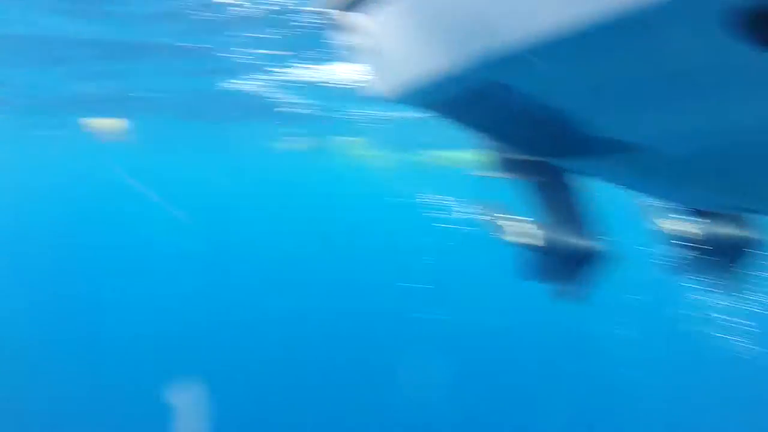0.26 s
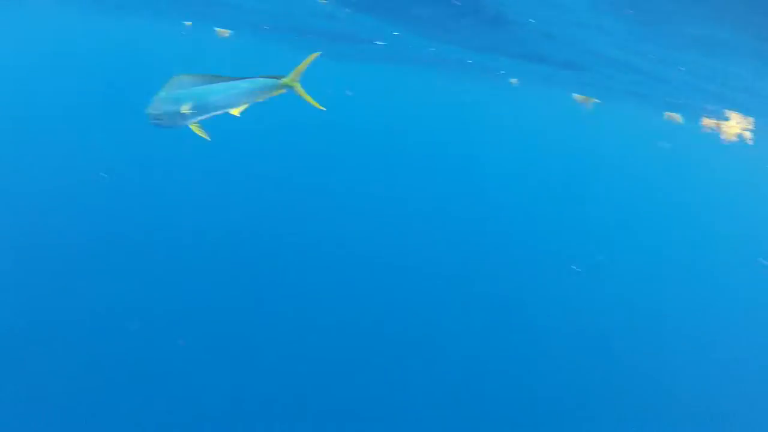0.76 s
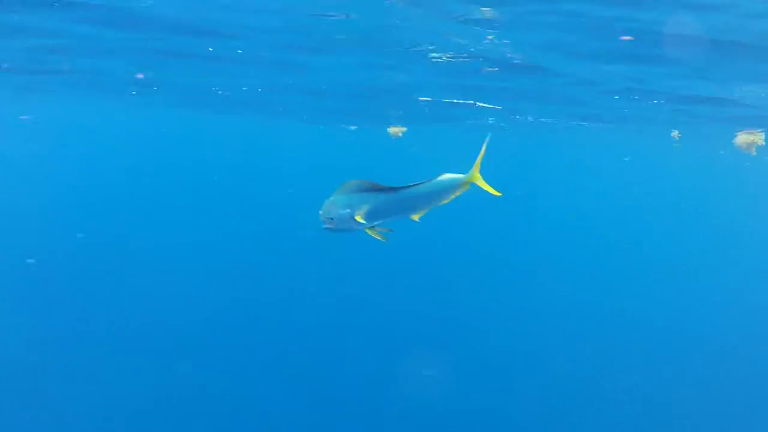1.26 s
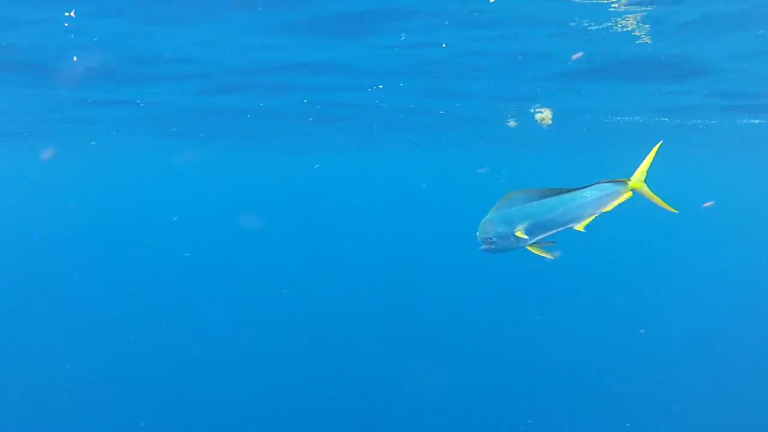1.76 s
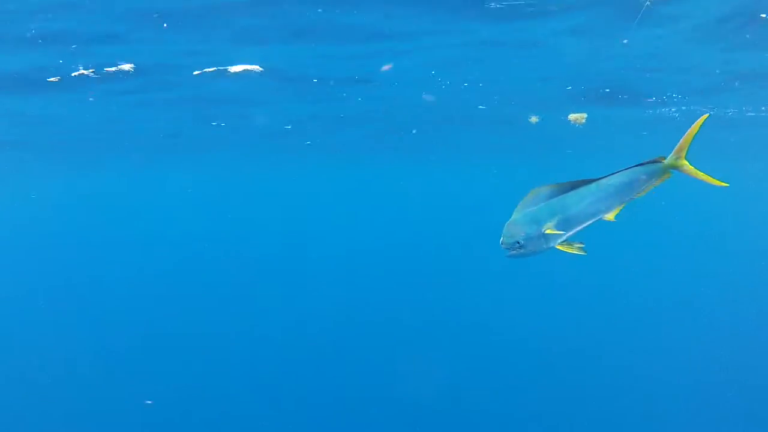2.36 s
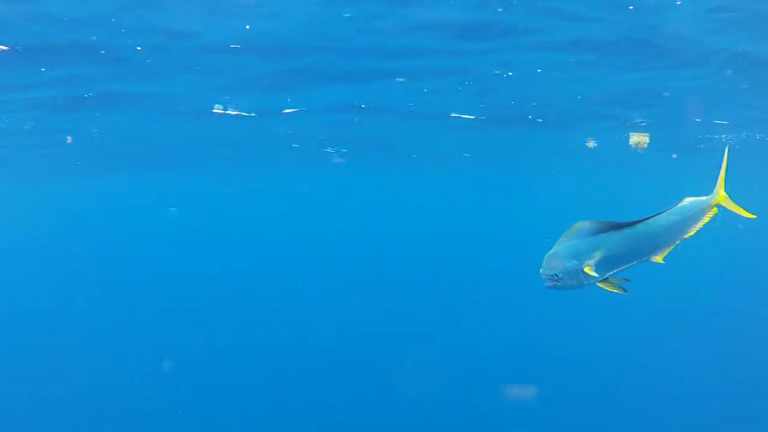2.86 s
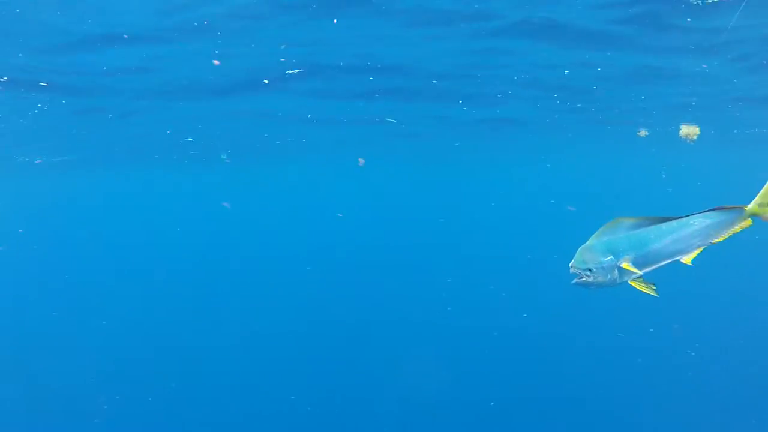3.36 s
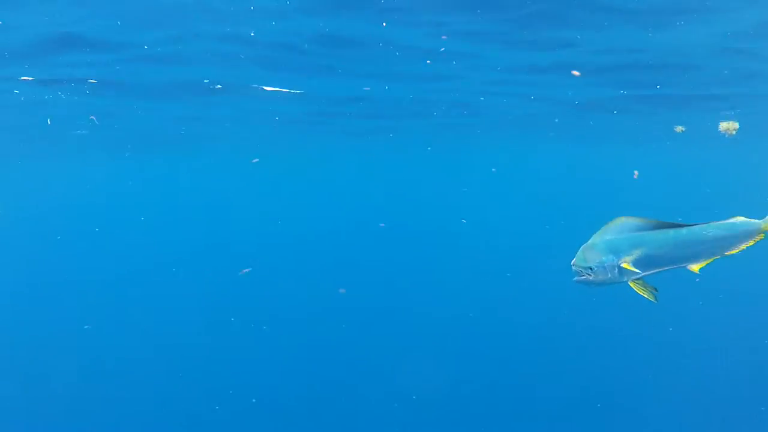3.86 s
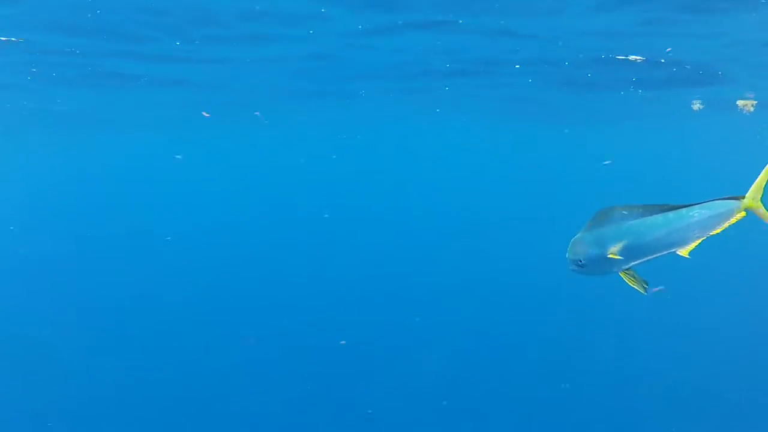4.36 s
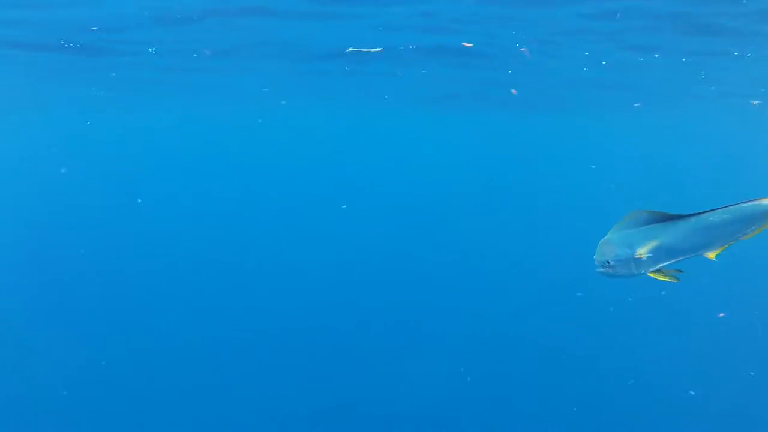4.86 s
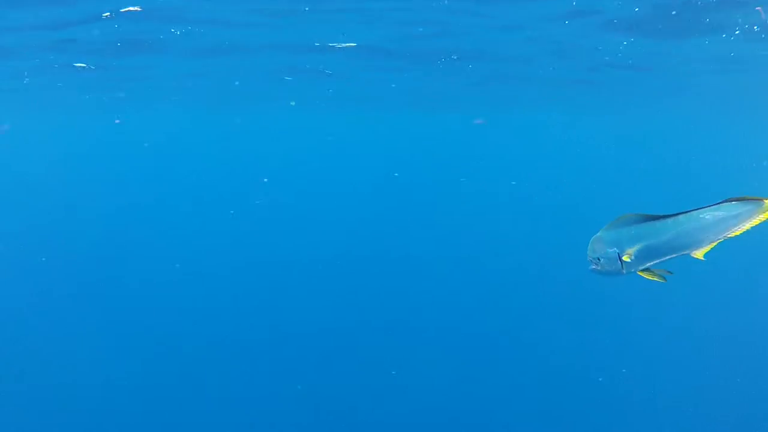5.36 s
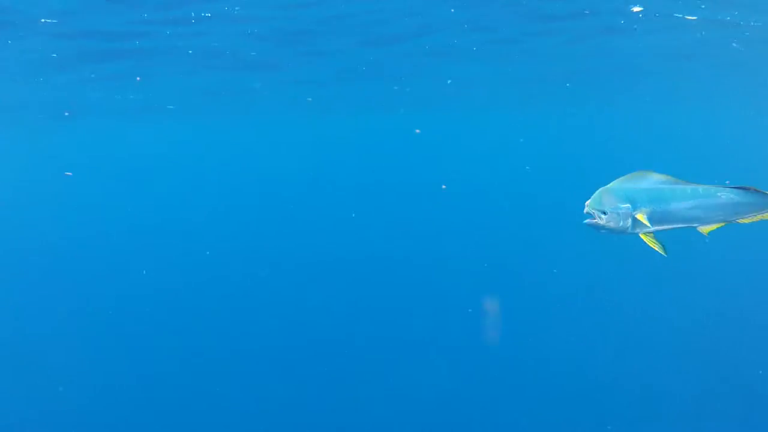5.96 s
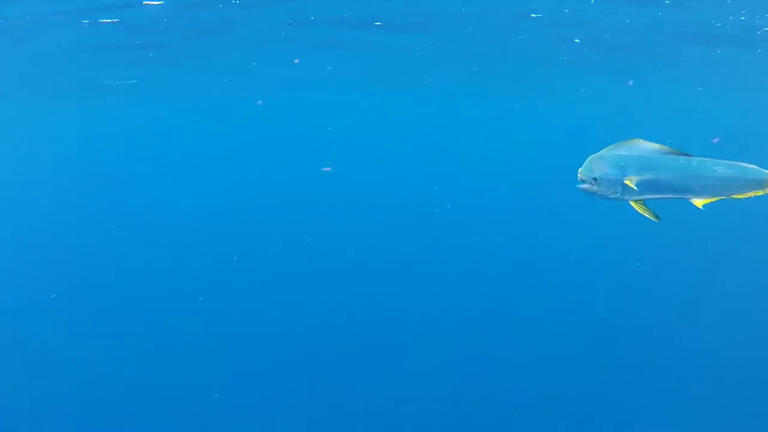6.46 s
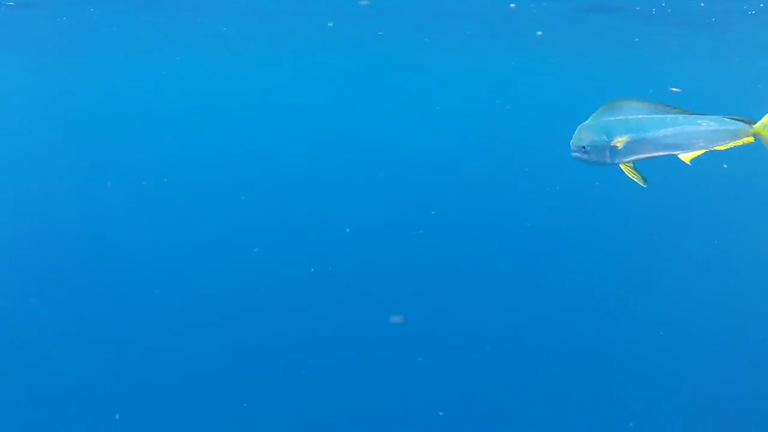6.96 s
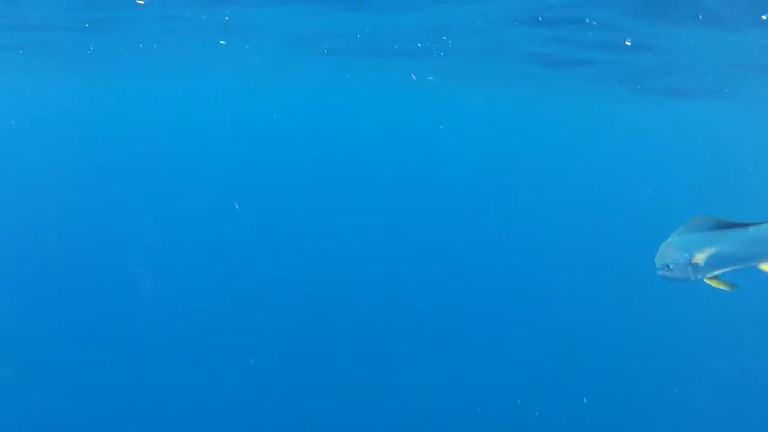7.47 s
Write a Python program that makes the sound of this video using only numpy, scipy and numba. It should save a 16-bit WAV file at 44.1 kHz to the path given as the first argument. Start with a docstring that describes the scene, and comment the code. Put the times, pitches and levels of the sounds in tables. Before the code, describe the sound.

A waterproof camera is dipped into the sea beside a boat, heard from inside its housing. Water slaps and sloshes against the case with a deep, heavy boom. Trapped air gurgles and fizzes away in glugs and small pinging bubbles. A quiet, muffled underwater wash follows, with a faint low hum and waves lapping overhead. At the end, sloshing and bubble pops return as the camera surfaces.

```python
"""A camera dipped into the sea

Beside a boat, a waterproof housing goes under, stays there and comes up, its microphone inside.
Flow makes the housing boom, water slaps it, trapped air gurgles away; then a muffled wash is left.
The recorder samples slowly and holds each sample, mirroring every sound into a thin, glassy treble."""
import sys
import numpy as np
from scipy import signal
from scipy.fft import rfft, irfft, next_fast_len
from scipy.io import wavfile
from scipy.ndimage import uniform_filter1d
from numba import njit

SR = 44100
rng = np.random.default_rng(int(sys.argv[2]) if len(sys.argv) > 2 else 0)


def to_wav(sig):
    """Store sig (one row per channel, or 1-D mono) as 16-bit WAV at the path in sys.argv[1].

    Samples outside -1..1 are clipped; the rate is SR.
    """
    pcm = np.clip(np.atleast_2d(sig), -1, 1) * 32767
    pcm = np.round(pcm).astype(np.int16)
    wavfile.write(sys.argv[1], SR, pcm.T)  # frames by channels


N = 340452

# Steady flow along the housing. Each row: time in seconds, rumble in dB, slosh in dB.
FLOW = [(0, -36, -52), (.16, -27, -37.5), (.43, -24.5, -52), (.57, -25, -25), (.77, -31, -56),
        (1.03, -43, -35.5), (1.08, -30, -36), (1.52, -29.5, -44.5), (1.76, -36, -36.5), (1.95, -33, -48.5),
        (2.4, -36, -59), (3, -38.5, -63), (4.6, -42, -60.5), (6.3, -43.5, -61), (7.3, -38.5, -59),
        (7.72, -31, -40)]
# Surges against it. Each row: arrival and hold in seconds, then rumble, drone and slosh in dB.
SURGES = [(0.219, 0.041, -19.5, -12, -23.5), (0.324, 0.03, -20, -20, -22), (0.469, 0.081, -21, -14, -21),
          (0.563, 0.036, -21, -3.5, -24.5), (0.661, 0.042, -7.5, -6.5, -33.5),
          (0.766, 0.054, -23.5, -11, -52), (0.899, 0.068, -27, -15.5, -40.5), (1.142, 0.048, -26, -20, -37),
          (1.249, 0.043, -20, -23, -31.5), (1.385, 0.022, -28, -31, -38), (1.653, 0.051, -22, -34, -33),
          (1.79, 0.13, -38, -31, -51), (2.016, 0.076, -25.5, -33, -42), (2.164, 0.35, -45, -29.5, -62),
          (2.55, 0.096, -33, -22, -63), (2.77, 0.043, -37, -34, -66), (3.412, 0.26, -39, -36.5, -71),
          (6.647, .25, -41, -44, -69), (7.395, 0.044, -30.5, -51, -41), (7.482, 0.065, -24.5, -49, -35.5)]
def flow():
    """Strength of rumble, drone and slosh: surges add their power to the steady flow."""
    rumble_db, slosh_db = curve(FLOW)
    power = np.array([undb(rumble_db) ** 2, np.zeros(N), undb(slosh_db) ** 2])
    for s, hold_s, *levels_db in SURGES:
        power += undb(levels_db)[:, None] ** 2 * swell(s, hold_s, rise_s=.025, t60=.18) ** 2
    return np.sqrt(power)


# The housing, heard from inside. Each row: centre and width in Hz, relative level in dB.
BOOM_MODES = [(24.2, 9.3, -7), (49.2, 9.3, 1), (59.4, 13, 3.5), (80.5, 25.3, -2), (131, 124, -24)]
# Its main resonance drops on the way under. Each row: time in seconds, pitch in Hz.
DRONE_PITCH = [(.53, 60.12), (.61, 50.52)]
def rumble(push, ring):
    """Eddies push on the housing, which booms; surges hold its main resonance ringing as a drone."""
    drone_hz, = curve(DRONE_PITCH)
    boom = push * steady(resonate(rng.standard_normal(N), BOOM_MODES), span_s=.08)
    return boom + ring * tone(drone_hz + .5 * walk(16))


# The walls around the microphone. Each row: centre and width in Hz, relative level in dB.
SLOSH_MODES = [(124, 42, -6), (218.8, 50, -0.5), (254.6, 25, -1), (291, 14.7, -9), (435, 170, -10.5),
               (800, 830, -30)]
def slosh(strength):
    """Near the surface, water drums on the walls; at depth this dies away."""
    return strength * steady(resonate(rng.standard_normal(N), SLOSH_MODES), span_s=.082)


# Large bubbles close by. Each row: start in seconds, relative level in dB, pitch in Hz, t60 in seconds.
GLUGS = [(0.361, -2.5, 609, 0.017), (0.447, -8.5, 573, 0.077), (0.459, -11.5, 423, 0.098),
         (.492, -15, 463, 0.036), (.568, -14.5, 448, .04), (0.975, -3, 639, 0.0077),
         (0.99, 4.5, 588.3, 0.018), (1.006, -9.5, 522.7, 0.063), (1.067, -17.5, 488.3, 0.054),
         (1.135, -11.5, 539.8, 0.0597), (1.168, -7, 619.3, 0.037), (1.191, 0.5, 525.4, 0.021),
         (1.274, -14.5, 640, 0.044), (1.373, -11, 593.6, 0.021), (1.399, -11.5, 482, 0.044),
         (1.627, -15, 508.6, 0.053), (1.709, -11, 565, 0.16), (1.742, -9, 538.8, 0.087),
         (1.787, -19, 558.3, .07), (2.031, -19.5, 609, 0.076), (2.068, -14.5, 604, 0.041),
         (3.11, -30, 490, .07), (3.435, -25.5, 472, 0.061), (5.158, -29, 472, 0.081),
         (5.913, -28.5, 595, 0.05), (6.483, -24.5, 594, 0.056), (7.476, -23.5, 543, 0.034),
         (7.668, -11, 584, 0.026), (7.676, -15.5, 403, 0.045)]
def glugs():
    """Large bubbles pulsate, each on a slightly falling note."""
    out = np.zeros(N)
    for s, db, hz, t60 in GLUGS:
        add(out, s, undb(db - 2.5) * bubble(hz, t60, glide=-.026, rise_cycles=1.7))
    return out


# Colours of smack and spray. Each row: centre and width in Hz, relative level in dB.
SMACK_MODES = [(503, 255, 0), (1220, 740, -14)]
SPRAY_MODES = [(1950, 2300, 6), (3570, 1100, -3), (5200, 1700, -15)]
# Short noisy bursts near the microphone: water slaps and clusters of bubbles popping.
# Each row: start in seconds, relative level in dB, t60 in seconds, spray against smack in dB.
SLAPS_AND_POPS = [(0.324, 0, 0.019, -20), (0.334, -3, 0.13, -18), (0.361, 5.5, 0.015, -9.5),
                  (0.378, -23, 0.13, 5.5), (0.989, -5, 0.014, -17), (1.101, -14, 0.04, -3.5),
                  (1.144, -15, 0.037, -2), (1.168, -7, 0.094, -2), (2.068, -19.5, 0.04, -8),
                  (7.666, -8, 0.035, 8), (7.673, -13, 0.036, 7), (7.68, -20, 0.013, -3)]
def slaps_and_pops():
    """Water slaps or a cluster of bubbles pops: a dull smack and a brighter spray."""
    out = np.zeros(N)
    for s, db, t60, spray_db in SLAPS_AND_POPS:
        smack = burst(t60, SMACK_MODES, rise_s=.0009)
        spray = undb(spray_db) * burst(t60, SPRAY_MODES, rise_s=.00073)
        add(out, s, undb(db - 10.5) * (smack + spray))
    return out


# Where the microphone is. Each row: time in seconds, depth from 0 (surface) to 1 (fully under).
DEPTH = [(.45, 0.06), (.95, 1), (7.2, 1), (7.4, 0)]
SURFACE_CYCLES, DEEP_CYCLES = 36, 58
def ping(s, hz, snap_db):
    """A small bubble snaps free and rings, for more cycles at depth."""
    depth = np.interp(s, *np.transpose(DEPTH))
    cycles = SURFACE_CYCLES + (DEEP_CYCLES - SURFACE_CYCLES) * depth
    out = np.zeros(SR // 8)
    add(out, 0, bubble(hz, cycles / hz, glide=.015, rise_cycles=1.34)[:len(out)])
    add(out, 0, undb(snap_db) * burst(.018, SPRAY_MODES, rise_s=.001))
    return out


# Small bubbles close by. Each row: start in seconds, level in dB, pitch in Hz, snap against ring in dB.
PINGS = [(.0985, -17, 2230, -23), (0.1074, -21, 1870, -12), (.1148, -34, 3370, -1), (0.1372, -33, 3600, 0),
         (0.2066, -14.5, 2205, -5.5), (0.2883, -23.5, 3230, -2.5), (.2933, -27, 5140, -10),
         (.3087, -6, 2275, -12.5), (.3742, -6.5, 2490, -10), (.379, -10, 1360, -17),
         (0.3832, -1.5, 2330, -20), (.4069, -15.5, 3910, -9.5), (0.4415, -23, 2590, -6),
         (.458, -28.5, 4600, 1), (0.5008, -28, 4370, -18), (0.6642, -30, 1650, -0.5),
         (0.8249, -22, 1595, -13), (0.9025, -21, 1816, -5.5), (0.9346, -21.5, 1017, -17),
         (1.1009, -18.5, 1410, -9), (1.1008, -21.5, 2750, -22), (1.1448, -25, 2150, -6),
         (1.1648, -22.5, 4470, 4), (1.173, -19, 3836, -10), (1.1883, -9.5, 3540, -9),
         (1.2182, -23, 2370, -9), (1.3249, -12.5, 1267, -24), (1.3283, -13, 1557, -27),
         (1.37, -23.5, 1220, -21), (1.4673, -25.5, 1610, -22), (1.632, -23, 875, -22),
         (1.6326, -24, 2387, -27), (1.7877, -26, 2060, -29), (1.868, -41, 4520, -20),
         (1.914, -21.5, 1488, -22), (1.9624, -21, 1325, -21), (1.9702, -33.5, 2820, -13),
         (2.031, -38.5, 3220, 3), (2.066, -25, 971, -11), (2.0683, -26, 2240, -29), (2.145, -49, 3990, -18),
         (2.2, -51, 5400, -4), (7.448, -34, 3670, -3.5), (7.4484, -42, 5300, -9),
         (7.532, -21.5, 3200, -14.5), (7.5701, -23.5, 3700, -17), (7.615, -27, 1460, -3),
         (7.622, -11.5, 3770, -19), (7.6801, -11, 3430, -21)]
def pings(strays=12, churn_start_s=1.03, churn_end_s=1.52):
    """Small bubbles pinch off one by one, with faint strays in the churn after the plunge."""
    out = np.zeros(N)
    for s, db, hz, snap_db in PINGS:
        add(out, s, undb(db) * ping(s, hz, snap_db))
    for when, octave, faintness in rng.random((strays, 3)):
        s = churn_start_s + when * (churn_end_s - churn_start_s)
        add(out, s, undb(-27 - 12.8 * faintness) * ping(s, hz=1750 * 2 ** octave, snap_db=-7))
    return out


# Air leaving the housing. Each row: time in seconds, gurgle in dB, fizz in dB.
AIR = [(0, -37.5, -70), (.2, -33, -51), (.36, -29.5, -38), (.41, -56, -54), (.46, -25.5, -36),
       (.57, -22.5, -40), (.63, -39, -67), (.9, -47.5, -50), (1.03, -25, -39), (1.17, -27, -31.5),
       (1.46, -29.5, -37), (1.58, -35.5, -43.5), (1.74, -27.5, -40.5), (1.93, -33.5, -41),
       (2.1, -47, -52.5), (2.3, -53, -47)]
AIR_GONE_S = 2.4
def draining_air():
    """The air carried under gurgles and fizzes until it is gone; each glug stirs it up."""
    gurgle_db, fizz_db = curve(AIR)
    kicks = sum(undb(db - 23.5) * swell(s, hold_s=.011, rise_s=.0037, t60=.14)
                for s, db, _, _ in GLUGS if s < AIR_GONE_S)
    gurgle = np.hypot(undb(gurgle_db), kicks) * air_pocket()
    air_left = np.clip((AIR_GONE_S - np.arange(N) / SR) / .15, 0, 1)
    return air_left * (gurgle + undb(fizz_db) * fizz())


# Overtones of the trapped air. Each row: multiple of its pitch, width in Hz, relative level in dB.
POCKET_MODES = [(1.051, 219, -6), (1.52, 55, -17), (2.551, 167, -18.5)]
def air_pocket():
    """Trapped air rings on a note gliding from glug to glug; escaping bubbles kick its overtones."""
    pitch_hz, = curve([(s, hz) for s, _, hz, _ in GLUGS])
    settled = np.interp(np.arange(N) / SR, [.9, 1], [.3, 1])  # the note firms up after the plunge
    out = settled * undb(3.2 * walk(60) - 4) * tone(pitch_hz + 11 * walk(70))
    for multiple, width, db in POCKET_MODES:
        hz = multiple * pitch_hz
        kicks = restless_noise(spread_db=5.7, rate=90)
        overtone = bandpass(bandpass(kicks, hz, float(width)), hz, float(width))
        out += undb(db) * steady(overtone, span_s=.061)
    return out


# The fizz as it reaches the microphone. Each row: centre and width in Hz, relative level in dB.
FIZZ_MODES = [(910, 370, -7), (1425, 870, -2.5), (2140, 1330, -9.5), (3260, 2100, -23.5),
              (5200, 1500, -20.5)]
def fizz(count=950):
    """A swarm of tiny bubbles rings over faint noise, a few much louder than the rest."""
    out = undb(-24) * rng.standard_normal(N)
    for when, pitch, size, life in rng.random((count, 4)):
        hz = 750 * 6.13 ** pitch
        strength = undb(-4.2 * np.log(1 - .98 * size) - 16)
        cycles = 14 + 40 * life
        add(out, when * AIR_GONE_S, strength * bubble(hz, cycles / hz, glide=.051, rise_cycles=1.4))
    return steady(resonate(out, FIZZ_MODES), span_s=.058)


# Foam after the big splashes. Each row: start and end in seconds, upper limit of a tick in dB.
FOAM = [(.385, 0.511, -25.5), (1.16, 1.548, -39)]
def foam(count=40):
    """The finest bubbles of a splash crackle briefly, ever fainter."""
    out = np.zeros(N)
    for start_s, end_s, db in FOAM:
        for when, pitch, faintness in rng.random((count, 3)):
            tick = bubble(2600 * 2.15 ** pitch, t60=.011, glide=.05, rise_cycles=1.1)
            add(out, start_s + when * (end_s - start_s), undb(db - 14 * when - 12 * faintness) * tick)
    return out


# Bumps right on the housing. Each row: start in seconds, level in dB, pitch in Hz, t60 in seconds.
BUMPS = [(.475, -13, 31.8, 0.45), (.988, -13, 256.1, 0.069), (2.003, -22, 203, 0.041),
         (4.917, -28.5, 55.7, 0.52), (7.26, -23, 54.3, 0.13), (7.365, -28.5, 254, 0.046),
         (7.668, -19.5, 284, 0.075)]
def bumps():
    """A soft push sets one wall resonance thudding."""
    out = np.zeros(N)
    for s, db, hz, t60 in BUMPS:
        t, envelope = fade(t60, rise_s=.73 / hz)
        add(out, s, undb(db) * envelope * np.sin(2 * np.pi * hz * t))
    return out


# The sea all around, through the housing. Each row: centre and width in Hz, relative level in dB.
LAP_MODES = [(200, 490, -17.5), (339, 143, -8.5), (490, 184, -1.5)]
RIPPLE_MODES = [(588.4, 188, 3.5), (850, 76, -31)]
HISS_MODES = [(818, 140, -9), (1000, 250, -12), (1303, 315, -4), (1474, 415, -1), (1980, 450, 1),
              (2134, 290, -6), (2473, 240, -7), (2704, 430, -12), (3145, 590, -12.5), (3698, 620, -16),
              (4700, 2500, -29)]
# Waves above the microphone. Each row: crest time and half length in seconds, relative level in dB.
WAVES = [(3.14, 0.075, -52), (3.604, 0.36, -44.5), (5.197, 0.14, -50), (5.49, 0.23, -46),
         (5.93, 0.088, -50), (7.268, 0.15, -46)]
LAP_DB, RIPPLE_DB, HISS_DB = -50.5, -47.5, -49.5  # between waves, before ducking
def wash():
    """Waves lap and ripple overhead, restless and muffled, above a hollow hiss."""
    t = np.arange(N) / SR
    depth, = curve(DEPTH)
    wave_power = sum((undb(db) * np.exp(-((t - s) / half_s) ** 2 / 2)) ** 2 for s, half_s, db in WAVES)
    lapping = steady(resonate(restless_noise(spread_db=2.5, rate=25), LAP_MODES), span_s=.29)
    ripples = steady(resonate(restless_noise(spread_db=1.7, rate=25), RIPPLE_MODES), span_s=.22)
    hiss = resonate(rng.standard_normal(N), HISS_MODES)
    sea = np.sqrt(undb(LAP_DB) ** 2 + wave_power) * lapping
    sea += undb(RIPPLE_DB + .5 * walk(4)) * ripples
    sea += undb(HISS_DB + .21 * walk(1.1)) * hiss
    return undb(-1.5 * (1 - depth)) * sea  # ducks slightly during the loud plunge and the surfacing


def bubble(hz, t60, glide, rise_cycles):
    """A pulsating bubble: a damped sine whose pitch slides as it moves."""
    t, envelope = fade(t60, rise_cycles / hz)
    return envelope * np.sin(2 * np.pi * hz * t * (1 + glide * (t / t[-1] - .5) / 2))


def burst(t60, modes, rise_s):
    """A short, dense rush of coloured noise."""
    t, envelope = fade(t60, rise_s)
    noise = steady(resonate(rng.standard_normal(SR // 4), modes), span_s=.004)
    return envelope * noise[:len(t)]


def tone(hz):
    """A sine of rms 1 on a moving pitch."""
    return np.sqrt(2) * np.sin(2 * np.pi * np.cumsum(hz) / SR)


def restless_noise(spread_db, rate):
    """White noise whose level wanders."""
    return rng.standard_normal(N) * undb(spread_db * walk(rate))


def fade(t60, rise_s):
    """Time axis and envelope of a quick rise and a 60 dB decay, peak 1."""
    t = np.arange(int(max(t60, .004) * SR)) / SR
    envelope = (1 - np.exp(-(t / rise_s) ** 2)) * np.exp(-np.log(1000) * t / t[-1])
    return t, envelope / envelope.max()


def swell(s, hold_s, rise_s, t60):
    """Envelope that rises to 1 at time s, holds, and dies away."""
    t = np.arange(N) / SR - s
    rise = (np.minimum(t, 0) / rise_s) ** 2
    decay = np.log(1000) * np.maximum(t - hold_s, 0) / t60
    return np.exp(-np.minimum(rise + decay, 20))


def resonate(x, modes):
    """Colour a sound with steep-sided resonances; rms 1."""
    size = next_fast_len(len(x))
    f = np.arange(size // 2 + 1) * SR / size
    power = sum(undb(db) ** 2 / (1 + (2 * (f - hz) / width) ** 2) ** 4 for hz, width, db in modes)
    coloured = irfft(rfft(x, size) * np.sqrt(power), size)[:len(x)]
    return coloured / np.sqrt(np.mean(coloured ** 2) + 1e-20)


@njit
def bandpass(x, hz, width):
    """State-variable band-pass with a moving centre."""
    out, band_state, low_state = np.empty(len(x)), 0., 0.
    for i in range(len(x)):
        gain, damping = np.tan(np.pi * hz[i] / SR), width / hz[i]
        band = (band_state + gain * (x[i] - low_state)) / (1 + gain * (gain + damping))
        band_state = 2 * band - band_state
        low_state += 2 * gain * band
        out[i] = damping * band
    return out


def steady(x, span_s):
    """Scale to rms 1 within every short span."""
    return x / np.sqrt(np.abs(uniform_filter1d(x ** 2, max(int(span_s * SR), 1))) + 1e-12)


def walk(rate):
    """Random levels held 1 / rate s and slewed twice; spread near 1."""
    hold = int(SR / rate)
    held = np.repeat(rng.standard_normal(N // hold + 1), hold)
    return 1.32 * uniform_filter1d(uniform_filter1d(held, hold), hold)[:N]


def curve(rows):
    """Each column after the time as a control, one value a sample."""
    s, *columns = np.transpose(rows)
    return [np.interp(np.arange(N) / SR, s, column) for column in columns]


def undb(db):
    """Decibels to gain."""
    return 10 ** (np.asarray(db) / 20)


def add(out, s, sound):
    """Mix a sound in at time s."""
    start = int(np.clip(s * SR, 0, N - 1))
    out[start:start + len(sound)] += sound[:N - start]


def scene():
    """Everything reaches one microphone inside the housing."""
    push, ring, sloshing = flow()
    housing = rumble(push, ring) + slosh(sloshing)
    bubbles = draining_air() + pings() + glugs() + foam()
    return (housing + bubbles + slaps_and_pops() + bumps() + wash())[None]


HOLD_HZ, TOP_HZ = 12000, 15300  # the recorder's sampling rate and treble limit
def record(dry, repeats=15):
    """Slow sampling, overload, and a staircase output that mirrors the sound around the sampling rate."""
    samples = signal.resample_poly(dry, HOLD_HZ, SR, axis=1, window=("kaiser", 3), padtype="edge")
    held = np.repeat(np.clip(samples, -1, 1), repeats, axis=1)
    stairs = signal.resample_poly(held, SR, HOLD_HZ * repeats, axis=1, padtype="edge")
    lowpass = signal.ellip(10, .2, 70, TOP_HZ, fs=SR, output="sos")
    return signal.sosfilt(lowpass, stairs[:, :N])


dry = scene()
out = record(dry)
to_wav(out)
```